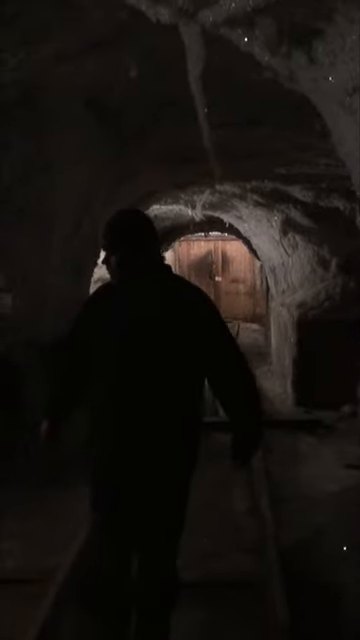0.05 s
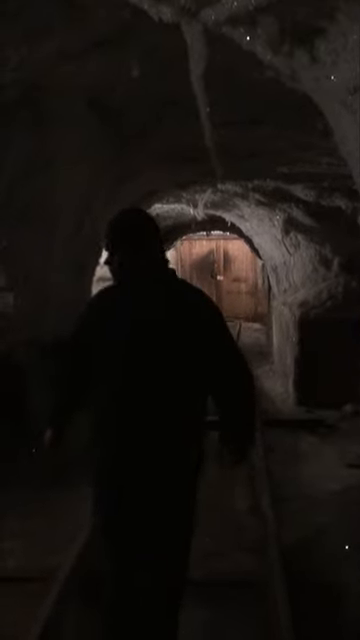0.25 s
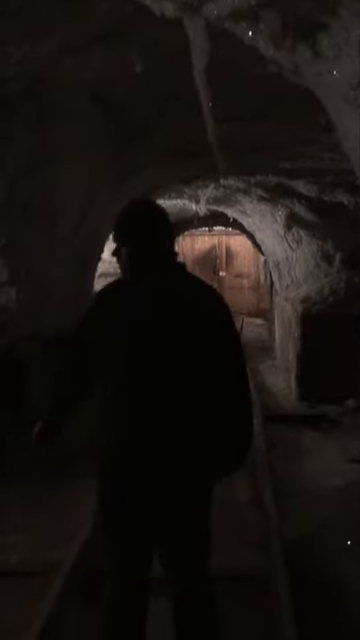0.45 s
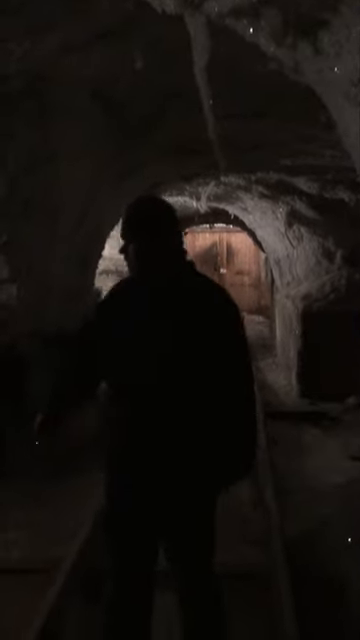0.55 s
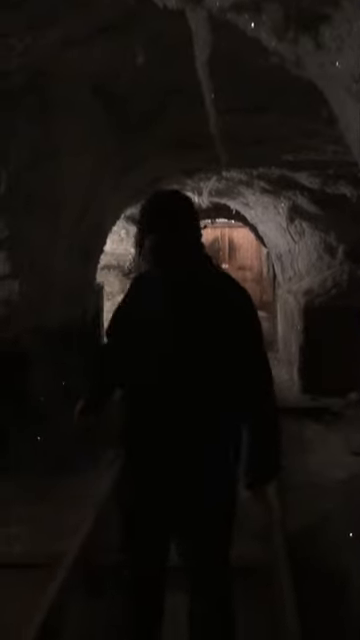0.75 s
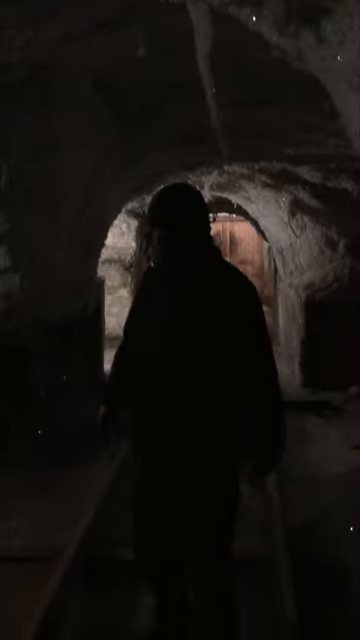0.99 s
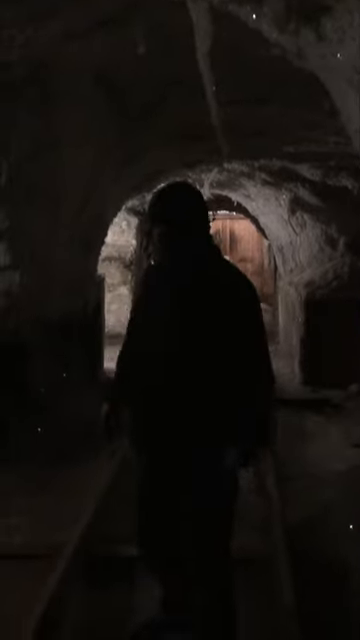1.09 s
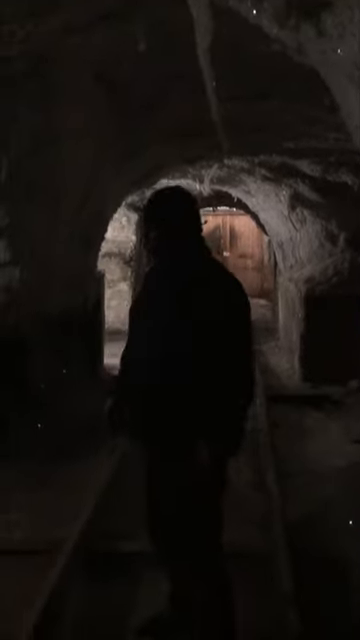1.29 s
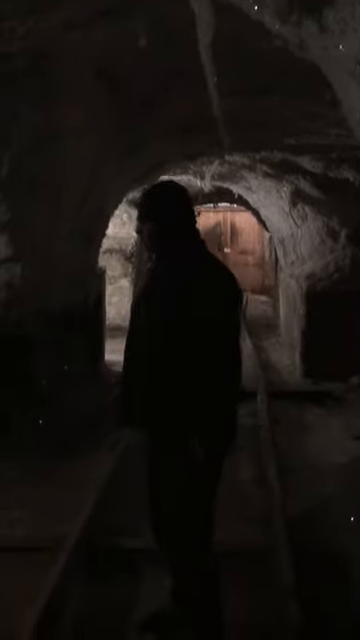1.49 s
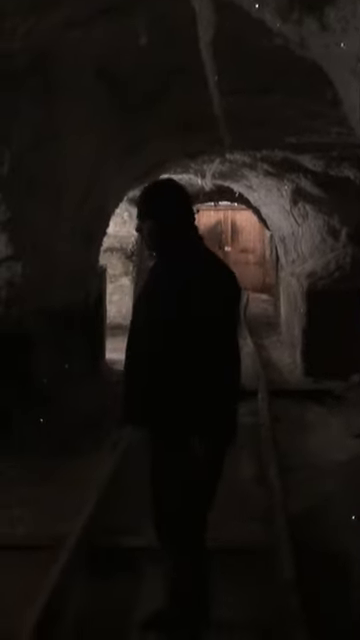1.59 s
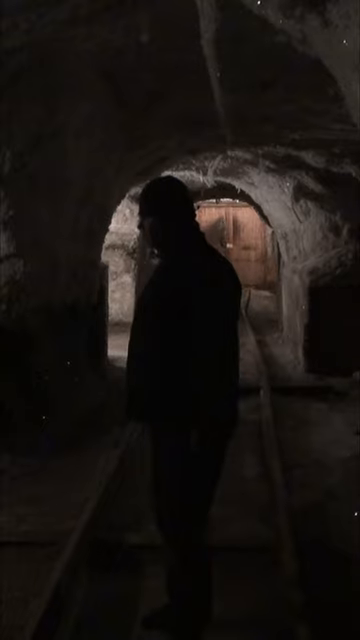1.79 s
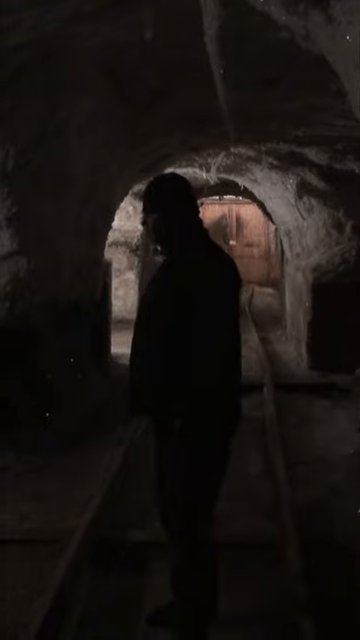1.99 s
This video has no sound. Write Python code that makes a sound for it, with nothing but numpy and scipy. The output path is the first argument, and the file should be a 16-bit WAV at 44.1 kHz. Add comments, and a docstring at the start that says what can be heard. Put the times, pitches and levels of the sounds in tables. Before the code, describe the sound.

Boots crunch on frosty grit in a stone tunnel: two crisp steps, a brief lull, then a longer grinding scuff as the walker turns. The steps sit slightly to the right, with short echoes over a faint hiss of air.

```python
"""Frosty steps in a stone tunnel

Someone takes a few steps and turns on frosty grit, a little to the right of a microphone pair.
Each push of a boot crushes fine frost, grinds coarser gravel and thumps the ground; crusts snap,
pebbles knock, the sole drags. The close walls answer at once, the tunnel rumbles on a little,
and a faint hiss of air lies underneath."""
import sys
import numpy as np
from scipy import signal
from scipy.fft import rfft, irfft
from scipy.io import wavfile
from scipy.ndimage import uniform_filter1d

SR = 44100
rng = np.random.default_rng(int(sys.argv[2]) if len(sys.argv) > 2 else 0)


def file_out(sig):
    """Save sig as 16-bit WAV at sys.argv[1]."""
    # one column per channel
    cols = np.atleast_2d(sig).T
    # limit, then scale
    lim = np.clip(cols, -1, 1)
    pcm = np.round(lim * 32767).astype(np.int16)
    wavfile.write(sys.argv[1], SR, pcm)


N = 90404


def amp(db):
    """Decibels to gain."""
    return 10 ** (np.asarray(db) / 20)


def unit(x):
    """Scales to rms 1."""
    return x / np.sqrt(np.mean(x ** 2) + 1e-20)


def read(points, hz):
    """Reads a table on a log-frequency axis."""
    knot_hz, value = np.transpose(points)
    return np.interp(np.log(hz + 1), np.log(knot_hz + 1), value)


def add(mix, start, sound):
    """Mixes a sound in at a time in seconds."""
    part = mix[max(round(start * SR), 0):][:len(sound)]
    part += sound[:len(part)]


def colour(x, spectrum, vary_db=0, size=2048):
    """Minimum-phase filter of unit energy, shaped like the spectrum and optionally bent at random."""
    hz = np.fft.rfftfreq(size, 1 / SR)
    knots = np.geomspace(300, 16000, 16)
    db = read(spectrum, hz) + vary_db * np.interp(hz, knots, rng.standard_normal(len(knots)))
    log_gain = np.log(amp(np.r_[db, db[-2:0:-1]]))
    taps = np.fft.ifft(np.exp(np.conj(signal.hilbert(log_gain)))).real
    return signal.fftconvolve(x, taps / np.linalg.norm(taps))[:len(x)]


def resonate(x, hz, width_hz):
    """A resonance of gain 1, fixed or gliding."""
    turn = np.exp(2j * np.pi * np.cumsum(hz * np.ones(len(x))) / SR)
    pole = np.exp(-np.pi * width_hz / SR)
    return 2 * (turn * signal.lfilter([1 - pole], [1, -pole], x / turn)).real


def noise_pair(coherence):
    """White noise, partly alike at the two microphones."""
    mid, side = rfft(rng.standard_normal((2, N)))
    alike = np.clip(read(coherence, np.fft.rfftfreq(N, 1 / SR)), 0, 1)
    mid, side = mid * np.sqrt((1 + alike) / 2), side * np.sqrt((1 - alike) / 2)
    return irfft([mid + side, mid - side], N)


def pan(x, balance):
    """Shares each frequency between the left and right microphones."""
    ratio = amp(read(balance, np.fft.rfftfreq(2 * N, 1 / SR)))
    gains = np.array([2 * ratio, np.full_like(ratio, 2)]) / (1 + ratio)
    return irfft(rfft(x, 2 * N) * gains)[:, :N]


# Spectrum of the air in the tunnel: (frequency [Hz], level [dB])
AIR_SPECTRUM = [(15, -46), (25, -17), (198, -8), (331, -9.5), (457, -6.5), (567, -4.5), (1710, -6.5),
                (1850, -10.5), (2560, -10), (4040, -15), (15500, -26)]
# How alike the air is at the two microphones: (frequency [Hz], coherence [0-1])
AIR_COHERENCE = [(40, 0.19), (300, 0.19), (2000, 0.31), (12000, 0.22)]
def air(level_db=-52.5):
    """The tunnel's faint steady hiss, wide across the microphones."""
    gain = amp(read(AIR_SPECTRUM, np.fft.rfftfreq(N, 1 / SR)))
    hiss = irfft(rfft(noise_pair(AIR_COHERENCE)) * gain, N)
    return amp(level_db) * unit(hiss)


# How long the tunnel rings: (frequency [Hz], time to fall 60 dB [s])
TAIL_DECAY = [(100, 2), (350, 0.56), (1000, 0.38), (3000, 0.24), (8000, 0.41), (15000, 0.55)]
# Strength of its tail: (frequency [Hz], level [dB])
TAIL_SPECTRUM = [(100, 6.5), (350, 4.5), (1000, 1), (3000, -5), (8000, -7), (15000, -17)]
# How alike the echoes are at the two microphones: (frequency [Hz], coherence [0-1])
ECHO_COHERENCE = [(60, .5), (300, .7), (2000, .62), (6000, .35), (14000, .3)]
def echoes(near_db=-1.5, near_rise_s=.001, near_t60_s=.065, tail_rise_s=.016):
    """A quick scatter from the ground and close walls, then a tail that lasts longest in the bass."""
    t = np.arange(N) / SR
    near = noise_pair(ECHO_COHERENCE) * np.exp(-np.log(1000) * t / near_t60_s)
    near *= np.minimum(t / near_rise_s, 1)
    near = amp(near_db) * near / np.linalg.norm(near[0])
    hz, frame_s, bands = signal.stft(noise_pair(ECHO_COHERENCE), SR, nperseg=256)
    rate = np.log(1000) / read(TAIL_DECAY, hz)[:, None]
    decay = np.exp(-rate * frame_s) * np.sqrt(2 * rate / SR)  # equal energy, long or short
    bands *= amp(read(TAIL_SPECTRUM, hz))[:, None] * decay
    tail = signal.istft(bands, SR, nperseg=256)[1][:, :N] * np.minimum(t / tail_rise_s, 1)
    return (near + tail)[:, :SR]


def tunnel(direct, spots=9, spot_s=.03):
    """Each spot on the ground has its own echoes; the boots pass from spot to spot."""
    position = (np.arange(N) / SR / spot_s) % spots
    reflected = np.zeros((2, N))
    for spot in range(spots):
        apart = abs((position - spot + spots / 2) % spots - spots / 2)
        share = np.cos(np.pi / 2 * np.minimum(apart, 1))
        reflected += signal.fftconvolve((direct * share)[None], echoes(), axes=1)[:, :N]
    return direct + reflected


# Weight landing on the tunnel floor: (time [s], level [dB], pitch [Hz])
FOOTFALLS = [(.243, -33, 257), (0.334, -40.5, 232), (.635, -40, 350)]
# Spectrum of one landing: (frequency [multiple of the pitch], level [dB])
THUD_SPECTRUM = [(.15, -41), (.45, -25.5), (1, -6.5), (2, -13.5), (4, -13), (10, -72)]
def thuds(rise_s=.0061, decay_s=.019):
    """The body's weight lands with a short dull push."""
    t, out = np.arange(SR // 4) / SR, np.zeros(N)
    envelope = np.minimum(t / rise_s, 1) * np.exp(-t / decay_s)
    for start, db, hz in FOOTFALLS:
        spectrum = [(hz * multiple, level) for multiple, level in THUD_SPECTRUM]
        add(out, start, amp(db) * envelope * unit(colour(rng.standard_normal(len(t)), spectrum)))
    return out


def rub(hz, q):
    """Dense slips through a steep resonance that follows the curve hz, held at an even level."""
    width = hz.mean() / q
    tone = resonate(resonate(rng.standard_normal(len(hz)), hz, width), hz, width)
    return tone / np.sqrt(uniform_filter1d(tone ** 2, size=700) + 1e-12)


# Slides over the grit: (time [s], length [s], level [dB], first pitch [Hz], last pitch [Hz])
SOLE_DRAGS = [(0.234, 0.18, -34, 1144, 1350), (1.334, 0.12, -36.5, 1510, 1310),
              (1.606, 0.19, -36.5, 2850, 2580)]
def drags():
    """A sliding sole sings in one narrow band that swells, glides and fades."""
    out = np.zeros(N)
    for start, length, db, from_hz, to_hz in SOLE_DRAGS:
        progress = np.linspace(0, 1, int(length * SR))
        glide_hz = from_hz + (to_hz - from_hz) * progress
        add(out, start, amp(db) * np.sin(np.pi * progress) * rub(glide_hz, q=4))
    return out


# Pebbles shifting underfoot: (time [s], level [dB], pitch [Hz])
PEBBLE_KNOCKS = [(.243, -28.5, 1580), (0.288, -29.5, 1200), (.338, -28, 1840), (.577, -37, 1360),
                 (.608, -22, 2410), (.624, -28.5, 940), (.648, -32, 1110), (1.3225, -29.5, 2000),
                 (1.569, -29.5, 1650)]
def pebbles(rise_s=.0013, decay_s=.0078):
    """A pebble gives way under the boot with a short gritty knock."""
    t, out = np.arange(SR // 8) / SR, np.zeros(N)
    envelope = np.minimum(t / rise_s, 1) * np.exp(-t / decay_s)
    envelope /= envelope.max()
    for start, db, hz in PEBBLE_KNOCKS:
        add(out, start, amp(db) * envelope * rub(np.full(len(t), hz), q=2.14))
    return out


# Single crusts breaking on the floor: (time [s], level [dB], pitch [Hz])
CRUST_SNAPS = [(0.213, -22, 5360), (0.2428, -19, 1290), (.272, -16.5, 6000), (0.2893, -6.5, 4830),
               (0.3204, -3, 5600), (0.3487, -20, 6200), (.367, -13, 6000), (0.468, -17, 8300),
               (0.574, -21, 1820), (0.635, -5.5, 7060), (0.65, -20, 6000), (0.681, -12, 7040),
               (0.6879, -14, 2850), (.832, -20, 3030), (.845, -23.5, 3400), (.899, -26.5, 6500),
               (0.945, -27, 4100), (.968, -30, 4150), (.989, -24.5, 8300), (1.2103, -27.5, 4870),
               (1.305, -17, 2980), (1.3222, -6.5, 4150), (1.426, -11.5, 6700), (1.479, -9, 5630),
               (1.54, -12, 4060), (1.57, -10, 2350), (1.7079, -9.5, 2770)]
# Bright colour shared by all snaps: (frequency [Hz], level [dB])
SNAP_SPECTRUM = [(100, -33), (1000, -0.5), (7000, -2), (11000, -3), (13500, 3), (16000, -9.5)]
def snaps(gain_db=.5, decay_cycles=.48, crumb_db=-20.5, crumb_decay_s=.011, size=900):
    """A crust breaks with a sharp tick, a ring of a cycle or two and a spray of crumbs."""
    t, out = np.arange(size) / SR, np.zeros(N)
    for start, db, hz in CRUST_SNAPS:
        ring = np.cos(2 * np.pi * hz * t) * np.exp(-t * hz / decay_cycles)
        ring[0] = .95  # the tick's leading edge
        crumbs = rng.standard_normal(size) * (rng.random(size) < .2)
        breaks = amp(crumb_db) * crumbs * np.exp(-t / crumb_decay_s)
        breaks[0] = 1  # the crust itself
        add(out, start, amp(db + gain_db) * np.convolve(breaks, ring))
    return colour(out, SNAP_SPECTRUM)


def crackle(spectrum, clumps, per_s, spread_db, kinds=8):
    """A steady stream of tiny fractures of uneven size and colour."""
    clicks = (rng.random(N) < per_s / SR) * rng.choice([-1, 1], N) * clumps
    clicks *= amp(spread_db * np.minimum(rng.exponential(1, N), 4))
    clicks /= np.sqrt(abs(uniform_filter1d(clicks ** 2, 1100)) + 1e-9)  # level evened over 25 ms
    kind = rng.integers(0, kinds, N)
    return unit(sum(colour(clicks * (kind == k), spectrum, vary_db=4.5) for k in range(kinds)))


# Spectra at the boot of fine frost, gravel, ground and splintering ice: (frequency [Hz], level [dB])
FROST_SPECTRUM = [(300, -61), (1500, -16.5), (3000, 2.5), (4200, -2.5), (6000, 0.5), (7800, -7.5),
                  (10500, -1.5), (13000, -10), (15800, -11)]
GRAVEL_SPECTRUM = [(100, -32), (350, -7), (520, -11.5), (850, -4.5), (1400, 3), (1900, 3), (2900, -2),
                   (4200, -6.5), (8000, -36), (16000, -4.5)]
THUMP_SPECTRUM = [(30, -44), (80, -26), (150, -12), (240, -8), (370, -0.5), (520, -9.5), (1000, -6.5),
                  (3000, -61)]
SPLINTER_SPECTRUM = [(3000, -19), (6000, -10), (11000, 0), (15800, -6)]
# Boots pressing into the floor: (time [s], rise [s], hold [s], release [s],
# frost level [dB], gravel level [dB], thump level [dB], rasp level [dB], rasp pitch [Hz])
BOOT_PUSHES = [ (-.01, 0.006, 0.0068, 0.13, -45.5, -43, -51.5, -47, 3800),
               (0.064, 0.092, 0.16, 0.064, -56, -61, -65, -63, 1180),
               (0.206, 0.016, 0.011, 0.071, -37.5, -37.5, -43.5, -39.5, 1160),
               (0.24, 0.0025, 0.028, 0.1, -42.5, -50, -44, -47, 1184),
               (0.281, 0.0064, 0.0052, 0.036, -31, -35, -61, -34, 1005),
               (0.307, 0.01, 0.012, 0.073, -25, -40, -62, -45, 1230),
               (0.332, 0.0044, 0.071, 0.08, -31, -39, -53.5, -34.5, 2460),
               (0.42, 0.015, 0.074, 0.42, -47, -56, -68, -73, 5400),
               (0.573, 0.0037, 0.028, 0.037, -35, -28.5, -39, -47, 1600),
               (0.586, 0.031, 0.034, 0.055, -27.5, -26.5, -44, -34, 1994),
               (0.671, 0.0055, 0.018, 0.11, -36.5, -48, -67.5, -39, 2910),
               (0.705, 0.024, 0.12, 0.081, -42.5, -42, -66, -43, 3244),
               (0.895, 0.0033, 0.0036, 0.069, -44.5, -47.5, -87, -74.5, 4160),
               (1.221, 0.0048, 0.019, 0.13, -49.5, -43, -51.5, -45.5, 850),
               (1.271, 0.008, 0.028, .03, -40, -49, -49, -60, 740),
               (1.296, 0.0061, 0.063, 0.054, -35, -31.5, -73, -38, 2010),
               (1.35, 0.0085, 0.052, 0.46, -38, -42.5, -55.5, -49.5, 764),
               (1.446, 0.028, 0.021, 0.24, -39, -36, -48.5, -43.5, 4800),
               (1.521, 0.011, 0.016, 0.081, -34.5, -31.5, -63, -38, 1900),
               (1.554, 0.013, 0.026, 0.11, -35.5, -28.5, -44, -39, 1850),
               (1.607, 0.0086, 0.059, 0.17, -33.5, -29.5, -52, -33.5, 1145),
               (1.667, 0.026, 0.027, 0.084, -29, -25.5, -48, -29, 2220),
               (1.736, 0.0082, 0.026, 0.0308, -35, -36, -43, -49, 1970)]
def scuffs(release_fall_db=34.5, clump_s=.005, rasp_q=4.3, splinter_db=23.5, splinter_growth=2.015):
    """Each push swells, holds and lets go; frost and gravel break in shared clumps, the sole rasps."""
    t, rasps = np.arange(N) / SR, np.zeros(N)
    clumps = amp(-unit(uniform_filter1d(rng.standard_normal(N), int(clump_s * SR))))
    frost = crackle(FROST_SPECTRUM, clumps, per_s=9000, spread_db=5.5)
    gravel, slips = (crackle(GRAVEL_SPECTRUM, clumps, per_s=2600, spread_db=4.5) for _ in range(2))
    thump = unit(colour(rng.standard_normal(N), THUMP_SPECTRUM))
    power = np.zeros((3, N))
    for start, rise, hold, release, frost_db, gravel_db, thump_db, rasp_db, rasp_hz in BOOT_PUSHES:
        released = np.maximum(t - start - rise - hold, 0) / release
        push = np.clip((t - start) / rise, 0, 1) * amp(-release_fall_db * released)
        power += (amp([[frost_db], [gravel_db], [thump_db]]) * push) ** 2
        width = 2 * rasp_hz / rasp_q
        rasp = resonate(resonate(slips, rasp_hz, width), rasp_hz, width)
        rasps += amp(rasp_db) * push * unit(rasp)
    envelopes = np.sqrt(power)
    # Icy splinters grow faster than the frost as the push gets harder.
    splinters = crackle(SPLINTER_SPECTRUM, clumps, per_s=1100, spread_db=6.5)
    splinters *= amp(splinter_db) * envelopes[0] ** splinter_growth
    return rasps + splinters + (envelopes * [frost, gravel, thump]).sum(0)


# The way from the ground to the microphones: (frequency [Hz], level [dB])
PATH_TO_MICS = [(100, 1), (190, -1), (320, -1), (520, 2.5), (720, 1.5), (1000, -1), (3000, -0.5), (4200, 2),
                (6000, 1), (11500, 0.5), (13500, -5), (15800, -12.5)]
# Narrow resonances of the tunnel that colour every step: (frequency [Hz], width [Hz], level [dB])
TUNNEL_RESONANCES = [(245, 31, -11), (740, 44, -5.5), (940, 60, -12), (1252, 20, -9), (1820, 103, -2),
                     (2682, 65, -3)]
def boots():
    """The steps, coloured on their way to the microphones; the tunnel rings at a few fixed pitches."""
    steps = colour(scuffs() + drags() + pebbles() + snaps() + thuds(), PATH_TO_MICS)
    return steps + sum(amp(db) * resonate(steps, hz, width) for hz, width, db in TUNNEL_RESONANCES)


# Where boots and air sit between the microphones: (frequency [Hz], left minus right [dB])
BOOT_BALANCE = [(60, -2), (99, -47), (160, -16), (270, -17.5), (450, -12.5), (740, -10.5), (1220, -7),
                (2010, -5), (3330, -3.5), (5500, -6.5), (9080, -0.5), (15000, -13)]
AIR_BALANCE = [(60, -31), (150, -5), (380, 0.5), (950, 2.0), (2380, 1.0), (5980, 2), (15000, -12)]
def scene(boots_db=-3.5):
    """Boots in the tunnel, a little to the right, over the air."""
    return pan(amp(boots_db) * tunnel(boots()), BOOT_BALANCE) + pan(air(), AIR_BALANCE)


def record(dry, cutoff_hz=15780):
    """The recorder's band limit."""
    taps = signal.firwin(1023, cutoff_hz, window=("kaiser", 9), fs=SR)
    return signal.oaconvolve(dry, taps[None], "same")


dry = scene()
out = record(dry)
file_out(out)
```